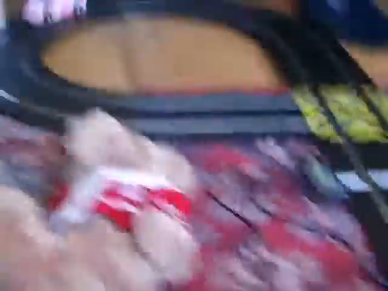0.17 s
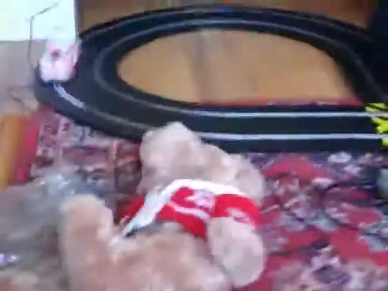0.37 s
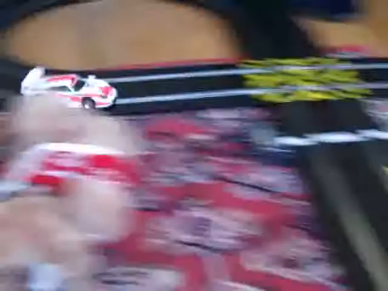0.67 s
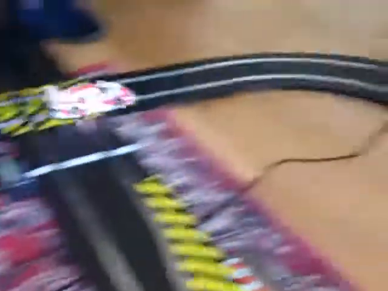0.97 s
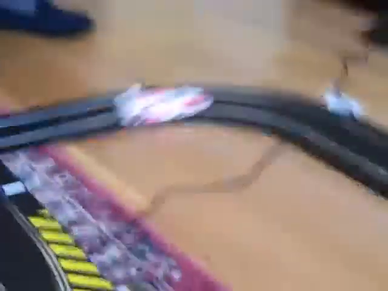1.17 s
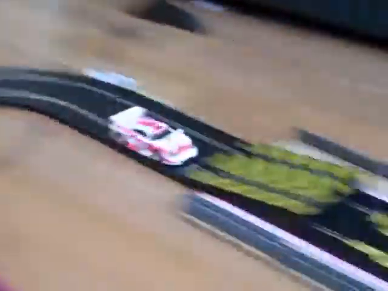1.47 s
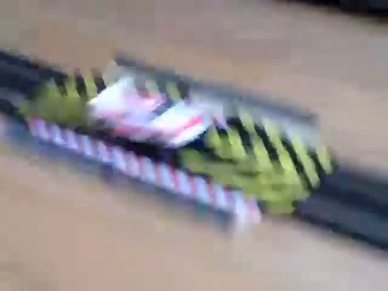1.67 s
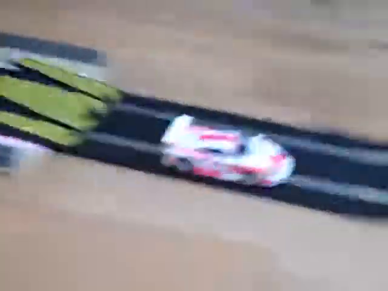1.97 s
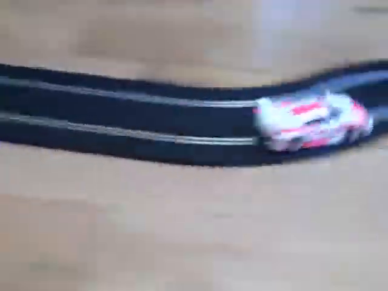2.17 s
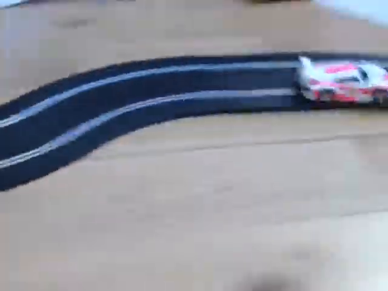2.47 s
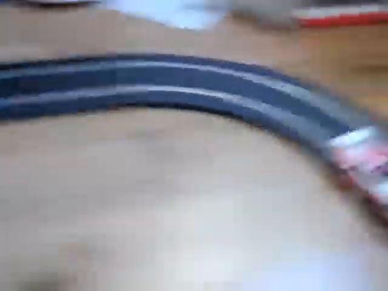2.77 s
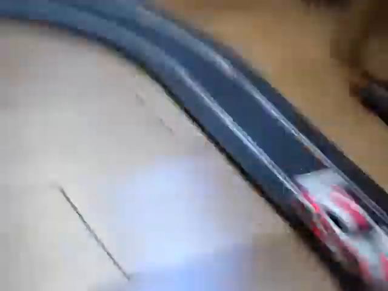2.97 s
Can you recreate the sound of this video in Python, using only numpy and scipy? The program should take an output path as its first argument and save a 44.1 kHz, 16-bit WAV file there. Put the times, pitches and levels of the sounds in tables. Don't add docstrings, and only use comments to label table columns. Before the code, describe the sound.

A toy slot car runs nonstop on plastic track indoors, gritty rushing and thin gear whine, light joint rattles throughout, sharpest clicks near the middle; close, rough, narrow-band small camera microphone.

```python
import sys
import numpy as np
from scipy import signal
from scipy.fft import rfft, irfft, next_fast_len
from scipy.io import wavfile
from scipy.ndimage import uniform_filter1d, map_coordinates

SR = 44100
rng = np.random.default_rng(int(sys.argv[2]) if len(sys.argv) > 2 else 0)


def transcribe(u):
    v = np.clip(np.atleast_2d(u).T, -1, 1)
    q = np.round(v * 32767).astype(np.int16)
    wavfile.write(sys.argv[1], SR, q)


def volts(x):
    e = np.asarray(x, float) / 20
    return 10 ** e


N = 137151

# time in seconds, level in dB.
FLOOR_LEVEL = [(0, -45), (.4, -45.5), (.5, -56), (.62, -43), (.82, -43), (.92, -60), (1.06, -38),
               (1.2, -46.5), (1.26, -69.5), (1.9, -60.5), (1.96, -48), (2.04, -52.5), (2.12, -40.5),
               (2.25, -49.5), (2.31, -35.5), (2.38, -47.5), (2.6, -44), (3.11, -39)]
# frequency in Hz, level in dB.
FLOOR_COLOUR = [(15, -27), (25, -20), (65, 0), (92, -0.5), (141, 4), (230, -10.5), (300, -44.5),
                (510, -120)]
# time in seconds, shaft turns per second in Hz, level in dB.
MOTOR_HUM = [(0, 300, -54), (.45, 320, -48), (.55, 285, -39), (.68, 270, -52), (.83, 235, -44),
             (.96, 270, -37), (1.06, 270, -56), (1.3, 375, -45), (1.53, 360, -46), (1.6, 330, -56),
             (1.68, 325, -45), (1.9, 335, -45), (1.98, 330, -62), (2.55, 385, -60), (2.68, 370, -47),
             (2.75, 285, -52), (2.8, 280, -37), (2.9, 275, -37), (2.95, 275, -58)]
# start in seconds, peak level in dB.
BLADE_TICKS = [
    (1.6017, -12.5),
    (1.8269, -5),
    (1.8987, -11.5),
    (2.2132, -9.5),
    (2.646, -12),
    (2.7208, -11.5),
]
# start in seconds, peak level in dB, rattle length in seconds,
# brightness in dB per octave, ringing pitch in Hz.
TRACK_JOINTS = [(0.03, -12.5, 0.025, -4.5, 1785), (0.1313, -12.5, 0.012, -2.5, 4630),
                (0.2498, -12, 0.022, 3.5, 4900), (0.3581, -13, 0.013, -6.5, 4700),
                (0.4471, -13, 0.023, -1, 1500), (0.469, -13, 0.017, 2, 4800),
                (0.9717, -12.5, 0.029, 1.5, 4260), (1.026, -12.5, 0.027, 3, 4810),
                (1.199, -17.5, 0.025, 1.5, 4790), (1.5984, -9, 0.019, 3.5, 5050),
                (1.6474, -14.5, 0.027, 6.5, 5200), (1.8494, -7.5, 0.022, -1, 1046),
                (1.893, -10.5, 0.01, 1.5, 1980), (1.976, -4, 0.017, -1, 5440),
                (2.175, -13.5, 0.03, -5.5, 1840), (2.2094, -9.5, 0.034, -2.5, 1920),
                (2.2515, -11.5, 0.02, -2.5, 1765), (2.285, -14.5, 0.03, -3, 5200),
                (2.3284, -14, 0.029, -1, 1430), (2.635, -14, 0.015, 1, 4570),
                (2.802, -18, 0.016, 0.5, 2000), (3.0447, -14, 0.021, 2, 1810),
                (3.086, -14.5, 0.023, 6.5, 5400)]
# time in seconds, rolling level in dB, extra tread level in dB.
TYRE_LEVEL = [(0, -42, 2.5), (.35, -45, -0.5), (.48, -34.5, -3), (.7, -42.5, 2), (1.05, -38.5, 0),
              (1.15, -47.5, 3.5), (1.3, -54.5, 5), (1.5, -50.5, 7.5), (1.68, -53.5, 13), (1.9, -48, 7.5),
              (2.02, -42.5, -8), (2.25, -39.5, -8.5), (2.35, -47.5, 5.5), (2.5, -46.5, -2.5),
              (2.6, -44, -9.5), (2.7, -47.5, -2.5), (2.9, -46.5, -2.5), (3.11, -42, -0.5)]
# frequency in Hz, level in dB.
ROLL_COLOUR = [(150, -24), (220, -2), (400, -2), (520, -3.5), (600, -39)]
# frequency in Hz, level in dB.
TREAD_COLOUR = [(480, -42), (580, -2.5), (750, -2), (900, -5), (1050, -29)]
# time in seconds, pitch in Hz, level in dB.
GEAR_WHINE = [(0, 980, -32), (.25, 895, -35), (.47, 1060, -37), (.6, 920, -37), (.84, 935, -35),
              (.93, 865, -33), (1.05, 840, -36), (1.19, 970, -33), (1.33, 1030, -29), (1.44, 930, -31),
              (1.57, 1000, -33), (1.65, 850, -31), (1.75, 940, -29), (1.86, 990, -33), (2.07, 960, -35),
              (2.21, 1030, -31), (2.5, 910, -33), (2.63, 900, -30), (2.7, 900, -44)]
# time in seconds, level in dB.
BRAID_LEVEL = [(0, -27), (.35, -28), (.5, -24.5), (.9, -29), (1.1, -26.5), (1.35, -25), (1.52, -28),
               (1.7, -22), (1.81, -26.5), (1.9, -25), (1.96, -26.5), (2.1, -25.5), (2.22, -24), (2.36, -23),
               (2.5, -26), (2.65, -25), (2.98, -28.5), (3.11, -27)]
# frequency in Hz, level in dB.
BODY_COLOUR = [(500, -37.5), (780, -7), (1020, -3), (1300, -7), (1820, -3.5), (2310, -7), (4570, -5.5),
               (6000, -6), (7800, -37), (13200, -120)]
# centre in Hz, width in Hz, boost in dB.
BODY_RINGS = [(1890, 180, 1), (2838, 500, 2.5), (4010, 250, -1), (4760, 600, 3.5), (5400, 420, 0),
              (5840, 560, 2.5)]
# frequency in Hz, size in dB.
ROUNDING_STEP = [(50, -7), (200, -6), (500, -4), (1000, -1.5), (2500, -1), (4200, .5), (4600, -2),
                 (6000, -2)]
# frequency in Hz, level in dB.
HISS_COLOUR = [(50, -8), (700, -5), (6500, 0), (7600, -1.5), (8200, -9.5), (8800, -25), (9100, -67.5)]


def unit(x):
    return x / np.sqrt(np.mean(x ** 2) + 1e-20)


def along(points, hz):
    f, v = np.transpose(points)
    return np.interp(np.log(hz + 1), np.log(f + 1), v)


def curves(rows):
    seconds, *columns = np.transpose(rows)
    return [np.interp(np.arange(N) / SR, seconds, column) for column in columns]


def wobble(rate):
    return map_coordinates(rng.standard_normal(N // 20), [np.arange(N) * rate / SR])


def phase(hz):
    return 2 * np.pi * np.cumsum(hz) / SR


def filtered(x, response):
    m = next_fast_len(N + SR // 4)
    return irfft(rfft(x, m) * response(np.fft.rfftfreq(m, 1 / SR)), m)[..., :N]


def coloured(x, colour):
    return filtered(x, lambda hz: volts(along(colour, hz)))


def patchy(x, depth_db):
    z = signal.stft(x, nperseg=512)[2]
    field = uniform_filter1d(rng.standard_normal(z.shape), size=5, axis=0)
    field = uniform_filter1d(field, size=5, axis=1)
    return signal.istft(z * volts(depth_db * unit(field)), nperseg=512)[1][:N]


def body_shell(hz):
    rings = sum(db / (1 + (2 * (hz - centre) / width) ** 2) for centre, width, db in BODY_RINGS)
    return volts(along(BODY_COLOUR, hz) + rings)


def floorboards():
    noise = coloured(rng.standard_normal(N), FLOOR_COLOUR)
    return volts(curves(FLOOR_LEVEL)[0]) * unit(noise * volts(3.2 * wobble(15)))


def motor():
    hz, level_db = curves(MOTOR_HUM)
    tone = np.sqrt(2) * np.sin(phase(hz + 9 * wobble(30)))
    return volts(level_db + 3.2 * wobble(35)) * tone


def blade_ticks():
    out, t = np.zeros(N + SR), np.arange(SR // 50) / SR
    for start, db in BLADE_TICKS:
        fade_db = -60 * t / 0.032
        out[round(start * SR):][:len(t)] += volts(db - 0.5 + fade_db) * rng.standard_normal(len(t))
    return filtered(out[:N], lambda hz: hz ** 2 / (hz ** 2 + 1200 ** 2))


def joints():
    out, t = np.zeros(N + SR), np.arange(SR // 5) / SR
    hz = np.fft.rfftfreq(len(t), 1 / SR)
    for start, db, length, tilt_db, ring_hz in TRACK_JOINTS:
        jumps_db = 2.2 * np.repeat(rng.standard_normal(len(t) // 60), 60)
        rattle = rng.standard_normal(len(t)) * volts(jumps_db)
        tilt = tilt_db * np.log2(hz / 2500 + 0.0068)
        ring = 6 / (1 + (4 * np.log2(hz / ring_hz + 0.013)) ** 2)
        burst = unit(irfft(rfft(rattle) * body_shell(hz) * volts(tilt + ring), len(t)))
        rise = np.clip(t / 0.006, 0, 1)
        fall = volts(-60 * np.clip(t - length, 0, None) / 0.05)
        out[round((start - .002) * SR):][:len(t)] += volts(db - 12) * rise * fall * burst
    return out[:N]


def tyres():
    roll_db, tread_db = curves(TYRE_LEVEL)
    roll = unit(coloured(patchy(rng.standard_normal(N), depth_db=3), ROLL_COLOUR))
    tread = unit(coloured(patchy(rng.standard_normal(N), depth_db=3), TREAD_COLOUR))
    return volts(roll_db + 0.98 + 1.2 * wobble(24)) * (roll + volts(tread_db) * tread)


def gear_whine():
    hz, level_db = curves(GEAR_WHINE)
    turn = phase(hz + 12 * wobble(30))
    steady_share, fuzz, fuzz_hz = .45, 0.73, 65
    whine = np.zeros(N)
    for k, db in [(1, 0), (2, -8)]:
        steady_part = steady_share / k + fuzz * wobble(fuzz_hz * k)
        side_part = fuzz * wobble(fuzz_hz * k)
        whine += volts(db) * (steady_part * np.cos(k * turn) + side_part * np.sin(k * turn))
    return volts(level_db - 1.5 + 2.3 * wobble(16)) * whine


def braid_rush():
    pulse = 1 + 0.35 * np.sin(phase(curves(MOTOR_HUM)[0]))
    scrape = rng.standard_normal(N) * pulse
    specks = rng.random(N) < .03
    grit = unit(rng.standard_normal(N) * specks * volts(2.4 * wobble(40)))
    rush = unit(scrape + volts(-11) * grit)
    rush = unit(filtered(patchy(rush, depth_db=1.67), body_shell))
    flutter_db = 0.7 * wobble(13) + 0.9 * wobble(30) + 0.8 * wobble(110)
    return rush * volts(curves(BRAID_LEVEL)[0] + flutter_db)


def scene():
    background = floorboards() + motor()
    knocks = blade_ticks() + joints()
    return (background + knocks + tyres() + gear_whine() + braid_rush())[None]


def coarse_camera(x):
    size = 1024
    n, count, lines = np.arange(2 * size), N // size + 2, np.arange(size // 3) + .5
    window = np.sin(np.pi * (n + .5) / (2 * size))[:, None]
    waves = np.cos(np.pi / size * np.outer(n + .5 + size / 2, lines))
    basis = window * waves * np.sqrt(2 / size)
    hz = lines * SR / (2 * size)
    index = np.arange(count)[:, None] * size + n
    frames = np.pad(x, (size, 3 * size))[index]
    peak = np.abs(frames).max(axis=1, keepdims=True)
    sharp = peak > 5.5 * frames.std(axis=1, keepdims=True)
    c = frames @ basis
    edge_hz, top_hz, top_db, top_share = 6050, 6420, 1, .36
    top_open = rng.random((count, 1)) < top_share
    c = c * np.where(hz < edge_hz, 1, volts(top_db) * top_open * (hz < top_hz))
    level = np.sqrt(np.mean(c[:, hz < edge_hz] ** 2, axis=1, keepdims=True))
    band = np.floor(20 * np.log(1 + hz / 900)).astype(int)
    uneven_db = 2.7 * rng.standard_normal((count, size))[:, band]
    step = level * volts(along(ROUNDING_STEP, hz) + 8.7 - 9 * sharp + uneven_db)
    c = np.sign(c) * np.floor(np.abs(c) / step + 0.52) * step
    return np.bincount(index.ravel(), (c @ basis.T).ravel())[size:size + N]


def camera_hiss(x):
    loudness = np.sqrt(np.abs(uniform_filter1d(x ** 2, size=100)))
    flutter_db = 2.53 * wobble(9.71) + 2.3 * wobble(70)
    noise = rng.standard_normal(N) * loudness ** 0.48 * volts(flutter_db)
    return volts(-45) * unit(coloured(noise, HISS_COLOUR))


def band_limit(x):
    return signal.sosfilt(signal.butter(12, 8830, fs=SR, output="sos"), x)


def record(dry):
    rough = coarse_camera(dry[0])
    mix = rough + camera_hiss(rough)
    return band_limit(mix[None])


dry = scene()
out = record(dry)
transcribe(out)
```